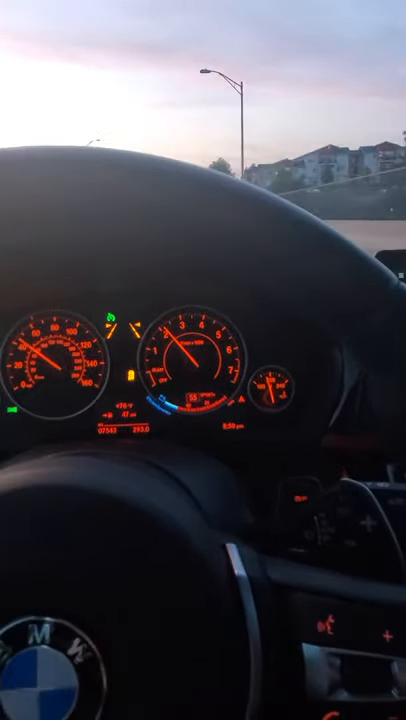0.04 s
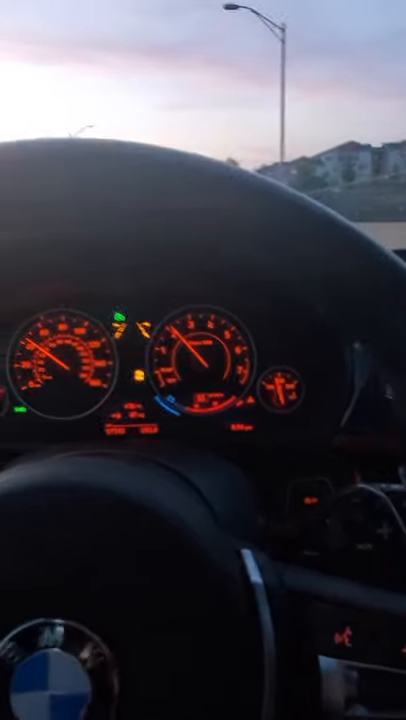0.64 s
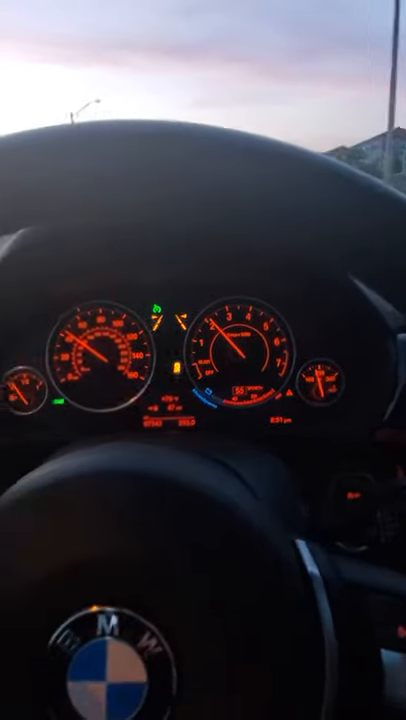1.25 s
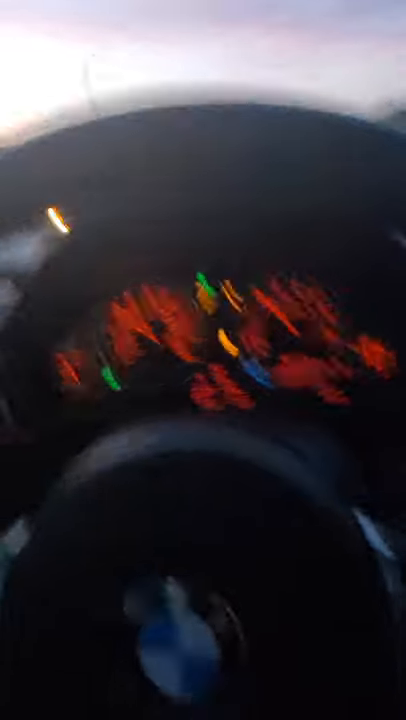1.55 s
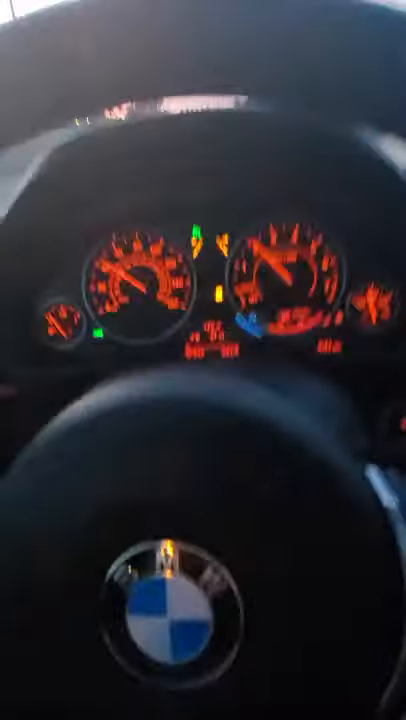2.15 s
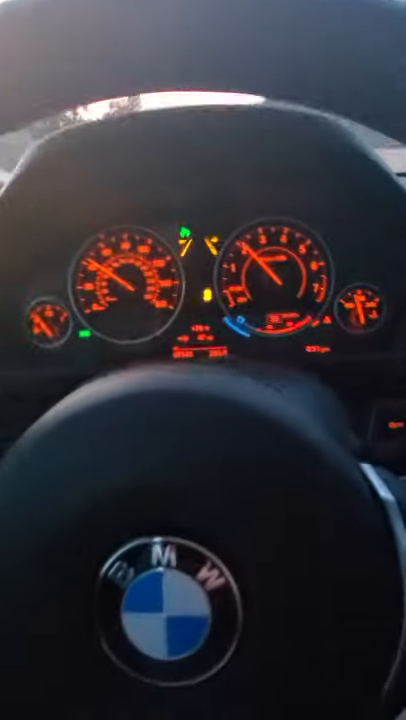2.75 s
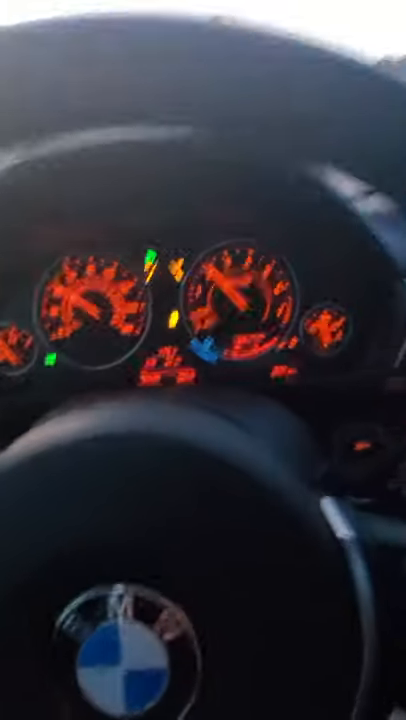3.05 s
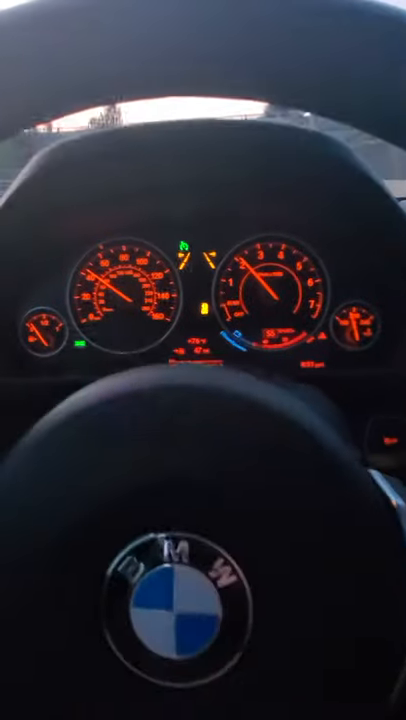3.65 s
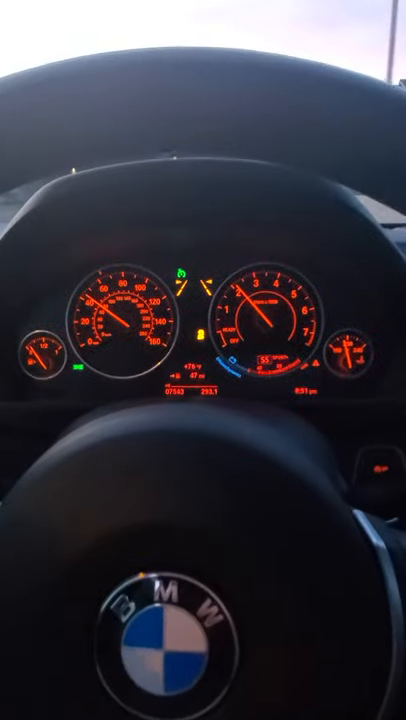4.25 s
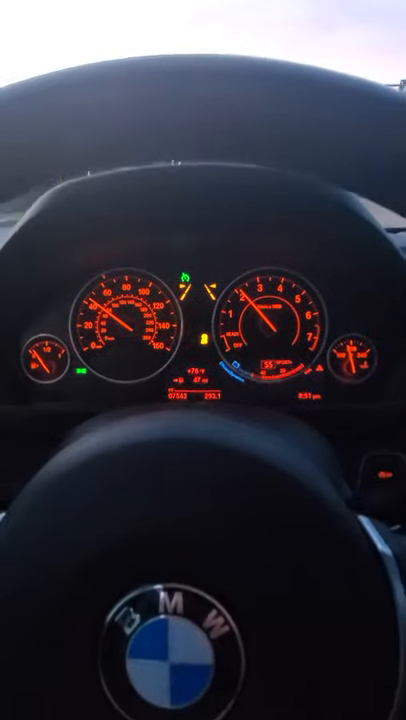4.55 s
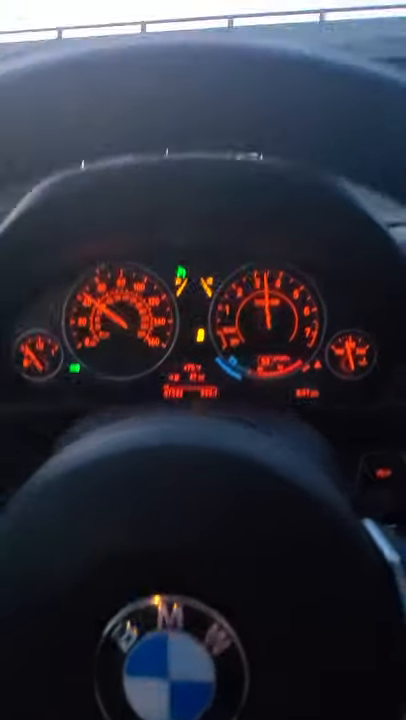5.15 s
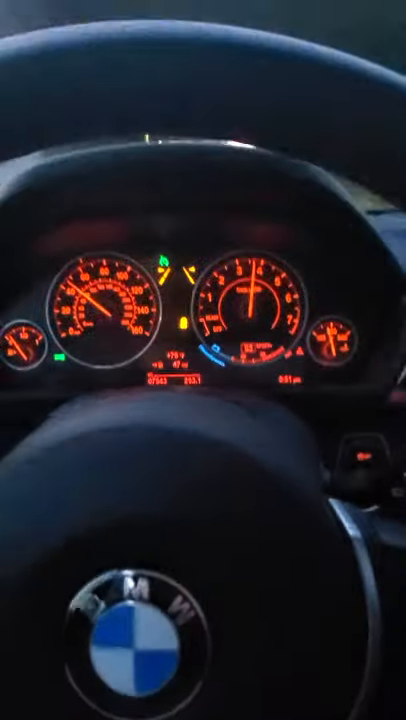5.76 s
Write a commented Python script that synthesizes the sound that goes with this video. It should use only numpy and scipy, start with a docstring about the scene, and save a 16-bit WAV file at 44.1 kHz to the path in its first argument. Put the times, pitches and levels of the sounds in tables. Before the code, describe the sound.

Low road rumble and tyre roar inside a moving car, then a shift paddle clicks and the engine growls up in revs.

```python
"""Highway downshift, inside a six-cylinder car

The road booms through the body and the tyres roar under a thin air hiss. A shift paddle clicks,
the gearbox changes down and the revs climb. Under load, firing pulses growl through the bulkhead,
clatter and gas noise rasp, the valve gear whines and the turbo starts to whistle."""
import sys
import numpy as np
from scipy import signal
from scipy.fft import rfft, irfft, next_fast_len
from scipy.io import wavfile
from scipy.ndimage import uniform_filter1d, map_coordinates

SR = 44100
rng = np.random.default_rng(int(sys.argv[2]) if len(sys.argv) > 2 else 0)


def generate_wav(signal):
    """Clip the signal to [-1, 1] and save it as 16-bit WAV at the path in sys.argv[1]."""
    frames = np.transpose(np.atleast_2d(signal))
    scaled = np.clip(frames, -1, 1) * 32767
    pcm = np.round(scaled).astype(np.int16)
    wavfile.write(sys.argv[1], SR, pcm)


N = 260190
TIME_S = np.arange(N) / SR
SIDES = np.array([[.5], [-.5]])  # splits a left-minus-right value over both channels


def amp(db):
    """Decibels to gain."""
    return 10 ** (np.asarray(db) / 20)


def unit(x):
    """Scale to rms 1."""
    return x / np.sqrt(np.mean(x ** 2) + 1e-20)


def along(points, hz):
    """Interpolate (freq_hz, value) points on a log axis."""
    freq_hz, values = np.transpose(points)
    return np.interp(np.log(hz + 1), np.log(freq_hz + 1), values)


def shape(spectrum):
    """Gain response from (freq_hz, level_db) points."""
    return lambda hz: amp(along(spectrum, hz))


def curve(points):
    """Interpolate (time_s, value) points per sample."""
    return np.interp(TIME_S, *np.transpose(points))


def ramp(start_s, length_s):
    """Rise from 0 to 1, then hold."""
    return np.clip((TIME_S - start_s) / length_s, 0, 1)


def swell(centre_s, half_s):
    """Bell of height 1."""
    return np.exp(-((TIME_S - centre_s) / half_s) ** 2)


def wobble(rate_hz):
    """Smooth random curve through knots at rate_hz."""
    knots = rng.standard_normal(int(N * rate_hz / SR) + 4)
    return map_coordinates(knots, [TIME_S * rate_hz])


def filtered(x, response):
    """Apply a complex frequency response."""
    size = next_fast_len(N + SR // 2)
    return irfft(rfft(x, size) * response(np.fft.rfftfreq(size, 1 / SR)), size)[..., :N]


def resonance(hz, mode_hz, width_hz):
    """Causal response of one mode."""
    return 1j * hz * width_hz / (mode_hz ** 2 - hz ** 2 + 1j * hz * width_hz)


def cabin(pair, colour):
    """Two unrelated signals to a coloured stereo field, rms 1: bass shared, treble diffuse."""
    # left-right likeness: freq_hz, correlation
    likeness = [(60, 1), (130, 0.99), (200, 1), (380, 0.62), (760, 0.65), (900, 0.28), (1100, 0.64),
                (1500, -0.34), (2400, -0.26), (4000, 0.081), (15000, -0.13)]
    def response(hz):
        angle = np.arccos(np.clip(along(likeness, hz), -1, 1)) / 2
        return colour(hz) * np.array([np.cos(angle), np.sin(angle)])
    mid, side = filtered(pair, response)
    return unit(np.array([mid + side, mid - side]))


def noise_band(pitch_hz, width_hz):
    """Cabin noise narrowed by a resonance, rms 1."""
    return cabin(rng.standard_normal((2, N)), lambda hz: resonance(hz, pitch_hz, width_hz) ** 2)


def bursts(rows):
    """One swelling, fading noise band per row."""
    return sum(amp(level_db) * swell(centre_s, half_s) * noise_band(pitch_hz, width_hz)
               for centre_s, half_s, pitch_hz, width_hz, level_db in rows)


def rumble(spectrum, window_samples):
    """Cabin noise with its power evened out over the window."""
    noise = cabin(rng.standard_normal((2, N)), shape(spectrum))
    power = uniform_filter1d(np.mean(noise ** 2, axis=0), window_samples)
    power = uniform_filter1d(power, window_samples // 2)
    return noise / np.sqrt(np.abs(power) + .02)


def patchy_noise(depth_db):
    """Two white noises with gain patches drifting over frequency and time."""
    spectra = signal.stft(rng.standard_normal((2, N)), nperseg=512)[2]
    field = uniform_filter1d(rng.standard_normal(spectra.shape[1:]), size=5, axis=0)
    field = uniform_filter1d(field, size=18, axis=1)
    return signal.istft(spectra * amp(depth_db * unit(field)), nperseg=512)[1][:, :N]


def body():
    """The road shakes the suspension and makes the cabin air boom; each bump adds a low thump."""
    # suspension spectrum: freq_hz, level_db
    shake_spectrum = [(12, -36.5), (24, -9.5), (31, 5.5), (39, 0), (52, 9), (62, 8.5), (75, -15.5),
                      (110, -62.5), (200, -140)]
    # cabin boom spectrum: freq_hz, level_db
    boom_spectrum = [(15, -84.5), (40, -43.5), (58, -9.5), (74, 0), (110, -4.5), (135, -2), (165, -8.5),
                     (187, -6), (220, -13.5), (260, -17.5), (330, -28.5), (700, -140)]
    # boom envelope: time_s, level_db
    boom_levels = [(0, -15.5), (0.5, -18), (1.0, -16), (1.8, -16.5), (2.8, -16), (3.4, -18), (4.3, -16),
                   (5.4, -16.5), (5.9, -18)]
    # road bumps: centre_s, pitch_hz, level_db
    bumps = [(0.021, 86, -21), (0.36, 48.4, -21), (0.76, 90, -18), (0.92, 88, -14), (1.04, 135.2, -21),
             (1.25, 84.9, -13.5), (1.46, 84, -20), (2.14, 135, -17), (2.24, 47.9, -23), (2.38, 50, -22),
             (2.5, 50, -17), (2.64, 70, -19), (2.8, 44, -20), (2.92, 141.8, -20.5), (4.42, 78.8, -21),
             (4.66, 135.7, -19), (4.96, 105, -18), (5.65, 102.6, -19), (5.79, 46.15, -16)]
    thumps = np.zeros(N)
    for centre_s, pitch_hz, level_db in bumps:
        tone = np.sqrt(2) * np.sin(2 * np.pi * (pitch_hz * TIME_S + rng.random()))
        thumps += amp(level_db) * swell(centre_s, half_s=.045) * tone
    shake = amp(-23) * rumble(shake_spectrum, window_samples=5000)
    boom = amp(curve(boom_levels)) * rumble(boom_spectrum, window_samples=7000)
    return shake + boom + thumps


def tyres():
    """The tread roars and sings in a few resonances; each coarse patch sets off its own note."""
    # roar spectrum: freq_hz, level_db
    spectrum = [(150, -23.5), (240, -19.5), (290, 5), (350, 5.5), (480, 0), (570, -7.5), (680, -1.5),
                (750, -6), (880, 2), (1200, -4), (1450, -7), (2300, -15.5), (2950, -20.5), (3650, -21),
                (4400, -29), (6000, -36.5), (7400, -43.5), (10000, -86.5)]
    # roar from surface coarseness: time_s, level_db
    surface = [(0, -31.5), (0.6, -30.5), (0.95, -29.5), (1.6, -31.5), (2.1, -31.5), (2.4, -30), (3.3, -30),
               (3.9, -31.5), (4.9, -30.5)]
    # coarse patches: centre_s, half_s, pitch_hz, width_hz, level_db
    patches = [(0.13, 0.066, 900, 150, -35.5), (0.24, 0.068, 1150, 220, -39), (0.63, 0.06, 409, 70, -38),
               (0.86, 0.053, 893, 170, -33.5), (0.95, .25, 2330, 350, -52), (1.02, 0.041, 1050, 200, -38),
               (1.13, .04, 840, 120, -34.5), (1.18, 0.11, 1197, 160, -39.5), (1.4, 0.069, 930, 250, -35),
               (1.69, 0.017, 1000, 300, -37.5), (2.42, 0.11, 1160, 280, -41),
               (3.04, 0.079, 1110, 110, -35.5), (3.23, 0.05, 904, 130, -36.5),
               (3.36, 0.038, 925, 180, -31.5), (3.42, 0.11, 1315, 200, -41.5),
               (3.52, 0.05, 1010, 200, -35.5), (3.55, 0.4, 1790, 650, -43.5)]
    # tread resonances: pitch_hz, width_hz, level_db
    modes = [(877, 95, -45), (1136, 110, -46), (1764, 62, -59), (2278, 90, -59)]
    roar = amp(curve(surface) + .22 * wobble(15)) * cabin(patchy_noise(depth_db=1), shape(spectrum))
    notes = bursts(patches)
    tread = sum(amp(level_db + 1.8 * wobble(9)) * noise_band(pitch_hz, width_hz)
                for pitch_hz, width_hz, level_db in modes)
    return roar + notes + tread


def air_hiss(pan_db):
    """Air hisses past the glass; pan_db is left minus right."""
    # hiss spectrum: freq_hz, level_db
    spectrum = [(4000, -35.5), (7000, -4.5), (7400, -2), (8700, 4.5), (10000, 2), (11500, -1), (14000, -3),
                (15800, -5.5)]
    # hiss envelope: time_s, level_db
    levels = [(0, -60.5), (0.6, -60), (0.72, -62.5), (0.9, -60), (1.25, -62), (1.53, -59.5), (1.8, -64),
              (2.1, -64.5), (2.4, -61.5), (2.75, -64.5), (3.2, -62), (4.45, -64), (4.75, -62),
              (4.88, -60.5), (5.02, -63), (5.4, -62)]
    level_db = curve(levels) + pan_db * SIDES + .8 * wobble(16)
    return amp(level_db) * cabin(patchy_noise(depth_db=1.4), shape(spectrum))


def road():
    """Tyres and air. Early on, the tone shifts slightly and the hiss moves in from the right."""
    # opening tone colour: freq_hz, gain_db
    early_colour = [(400, -0.5), (900, .5), (1700, -0.5), (2500, 2), (3100, 0.5), (3800, -3.5), (5500, 1.5),
                    (7500, -0.5), (10000, -1), (15000, 2)]
    early = 1 - ramp(start_s=1.62, length_s=.24)
    rush = tyres() + air_hiss(pan_db=-4 * early)
    return early * filtered(rush, shape(early_colour)) + (1 - early) * rush


def clicks():
    """Paddle pull and release, trim ticks: short scrapes ring the plastic, soft ones its low modes."""
    # contacts: start_s, peak_db, hardness_db_per_octave, t60_s, left_minus_right_db
    contacts = [(0.284, -42, 7.5, .03, -5.5), (4.7595, -37.5, 3.5, .03, -0.5),
                (4.7647, -25.5, 0.5, 0.018, -2.5), (4.7675, -20.5, -0.5, 0.017, 0.5),
                (4.774, -19.5, -14.5, .03, 5), (4.776, -37, 2, .035, -1.5), (4.831, -47.5, 10, 0.03, -3.5),
                (4.843, -44, 7, .04, 1.5), (5.556, -40.5, 7.5, 0.025, -1.5), (5.581, -42, 14.5, .025, 3.5),
                (5.719, -45, 11.5, .025, -4)]
    # plastic modes: pitch_hz, width_hz, level_db
    modes = [(730, 150, 10), (2010, 240, 12), (2740, 240, 8), (3450, 770, -1), (6000, 360, -1.5),
             (7640, 830, -8.5), (12000, 3000, -18)]
    attack_s = .0015
    out = np.zeros((2, N))
    for start_s, peak_db, hardness_db_per_octave, t60_s, pan_db in contacts:
        age_s = np.maximum(TIME_S - start_s, 0)
        envelope = (1 - np.exp(-age_s / attack_s)) ** 2 * amp(-60 * age_s / t60_s)
        def plastic(hz):
            return sum((-1) ** k * amp(level_db + hardness_db_per_octave * np.log2(pitch_hz))
                       * resonance(hz, pitch_hz, width_hz)
                       for k, (pitch_hz, width_hz, level_db) in enumerate(modes))
        ring = filtered(envelope * rng.standard_normal((2, N)), plastic)
        out += amp(peak_db + pan_db * SIDES) * ring / np.abs(ring).max()
    return out


def load_whines():
    """Brief high whines and whistles from the engine under load."""
    # whines and whistles: centre_s, half_s, pitch_hz, width_hz, level_db
    whines = [(5.46, 0.08, 3550, 130, -49.5), (5.59, .05, 3160, 90, -48), (5.65, .055, 2760, 129.8, -47),
              (5.66, 0.016, 1978, 300, -37.5), (5.677, 0.04, 3400, 300, -47),
              (5.823, 0.0549, 3300, 200, -45), (5.688, 0.045, 5940, 400, -51), (5.827, .04, 7120, 150, -57),
              (5.86, .06, 5830, 562, -51.5), (5.9, 0.03584, 8760, 496.5, -53.5)]
    return bursts(whines)


def turbo():
    """A breathy whistle climbs and grows as the turbine spools up."""
    start_s, start_hz, climb_hz_per_s, breath_hz = 5.6, 10700, 15600, 1400
    start_db, growth_db_per_s = -75, 41.5
    age_s = np.maximum(TIME_S - start_s, 0)
    phase = 2 * np.pi * np.cumsum(start_hz + climb_hz_per_s * age_s) / SR
    whistle = np.array([wobble(breath_hz) * np.sin(phase) + wobble(breath_hz) * np.cos(phase)
                        for _ in range(2)])
    return (age_s > 0) * amp(start_db + growth_db_per_s * age_s) * unit(whistle)


def hum(cycles, cycle_hz):
    """Low engine orders sweep through cabin resonances; uneven combustion makes them flutter."""
    # engine orders: cycle_multiple, level_db
    orders = [(6, 0), (9, -8), (12, 0)]
    # cabin drone: freq_hz, level_db
    drone = [(110, -35), (128, -25), (145, -22.5), (158, -18.5), (168, -28.5), (178, -38), (200, -35.5),
             (238, -32.5), (252, -25), (292, -26), (320, -40), (362, -33), (379, -41), (394, -32.5)]
    out = np.zeros(N)
    for multiple, level_db in orders:
        gain = amp(level_db + along(drone, multiple * cycle_hz) + 2.5 * wobble(55))
        out += gain * np.sqrt(2) * np.sin(2 * np.pi * (multiple * cycles + rng.random()))
    return out


def valve_whine(cycles):
    """High valve-gear orders ride on the revs, each fading on its own at either ear; rms 1."""
    # valve-gear orders: cycle_multiple, relative_db
    orders = [(20, -1.5), (26, -6.5), (33, -5), (36, -2.5), (48, -12.5), (60, -9.5), (84, -15), (108, -18),
              (120, -16)]
    out = np.zeros((2, N))
    for channel in out:
        for multiple, relative_db in orders:
            gain = amp(relative_db + 4 * wobble(18))
            channel += gain * np.sin(2 * np.pi * (multiple * cycles + rng.random()) + .5 * wobble(40))
    return unit(out)


def clatter(cycles, knots=1024):
    """Valves and injectors repeat one fine pattern every cycle."""
    patterns = rng.standard_normal((2, knots))
    position = cycles % 1 * knots
    return unit(np.array([map_coordinates(row, [position], mode="grid-wrap") for row in patterns]))


def firings(cycles, cylinders, uneven_db, scatter_db):
    """One pulse per cylinder and cycle; each cylinder has its own strength."""
    onsets = np.flatnonzero(np.diff(np.floor(cycles * cylinders))) + 1
    cylinder_db = uneven_db * unit(signal.detrend(rng.standard_normal((2, cylinders)), type="constant"))
    jitter_db = scatter_db * rng.standard_normal((len(onsets), 2)).T
    pulses = np.zeros((2, N))
    pulses[:, onsets] = amp(cylinder_db[:, np.arange(len(onsets)) % cylinders] + jitter_db)
    return pulses


def engine():
    """The throttle opens after the paddle: orders hum; growl, rasp and whine grow with the revs."""
    # four-stroke cycle rate through the downshift: time_s, cycle_hz
    revs = [(4.8, 19.5), (5.05, 20.7), (5.2, 23.3), (5.3, 25), (5.41, 27.8), (5.52, 30.7), (5.65, 31.2),
            (5.8, 31.9), (5.9, 32.2)]
    # combustion through the bulkhead: freq_hz, level_db
    growl_spectrum = [(100, -60), (350, -3.5), (480, 2), (550, -0.5), (620, 2), (800, 3.5), (930, -8.5),
                      (1320, -4), (1600, -30), (2500, -49), (5000, -120)]
    # clatter and gas noise: freq_hz, level_db
    rasp_spectrum = [(300, -83.5), (1000, -8.5), (1400, -3.5), (1850, 0), (2150, -1.5), (2400, -8.5),
                     (2650, -5), (2980, -11), (3350, -7.5), (3750, -13), (4050, -8.5), (4500, -19.5),
                     (5700, -22.5), (7600, -31.5), (9000, -26), (12000, -31), (15800, -34)]
    cylinders, cruise_hz = 6, 19
    cycle_hz = curve(revs)
    octaves = np.log2(cycle_hz / cruise_hz)
    cycles = np.cumsum(cycle_hz * (1 + .005 * wobble(30))) / SR

    throttle = ramp(start_s=4.75, length_s=.17)
    boost_db = 7 * ramp(start_s=5.51, length_s=.24)  # turbo pressure builds
    clunk_db = 8.5 * swell(centre_s=5.722, half_s=.0073)
    bite_db = 5.5 * swell(centre_s=5.727, half_s=.028)  # lower gear engages
    ease_db = -3 * swell(centre_s=5.765, half_s=.041)  # load eases once the gear is in
    growl_db = -40.5 + 14.5 * octaves + bite_db
    rasp_db = -63.5 + 34 * octaves + boost_db + clunk_db + ease_db
    whine_db = -60.5 + 29.5 * octaves

    drone = hum(cycles, cycle_hz)
    gas_puffs = (1 + .7 * np.cos(2 * np.pi * cylinders * cycles)) * rng.standard_normal((2, N))
    pulses = unit(firings(cycles, cylinders, uneven_db=4, scatter_db=5))
    combustion = .4 * pulses + .35 * clatter(cycles) + gas_puffs
    growl = amp(growl_db) * cabin(combustion, shape(growl_spectrum))
    rasp = amp(rasp_db) * cabin(1.8 * clatter(cycles) + gas_puffs, shape(rasp_spectrum))
    whine = amp(whine_db) * valve_whine(cycles)
    return throttle * (drone + growl + rasp + whine)


def scene():
    """The mix at the driver's seat, a little stronger and earlier on the right."""
    # balance: freq_hz, left_minus_right_db
    balance = [(60, -1), (200, -0.4), (300, -3.5), (380, -2), (490, -5.5), (630, 4), (770, -2.5),
               (920, -0.5), (1120, -1), (1400, -5.5), (2380, -5.5), (3700, -5), (4700, -1), (7300, 2.5),
               (9000, -2), (11200, -2.5), (14000, 1.5)]
    # bass delay on the left: freq_hz, lag_rad
    lag = [(20, .04), (60, 0.12), (120, 0.081), (250, 0.17), (600, 0.0028)]
    def seat(hz):
        return amp(SIDES * along(balance, hz)) * np.exp(-1j * SIDES * along(lag, hz))
    return filtered(body() + road() + engine() + load_whines() + turbo() + clicks(), seat)


def record(dry, cutoff_hz=15800):
    """Brick-wall low-pass."""
    return filtered(dry, lambda hz: hz < cutoff_hz)


dry = scene()
out = record(dry)
generate_wav(out)
```